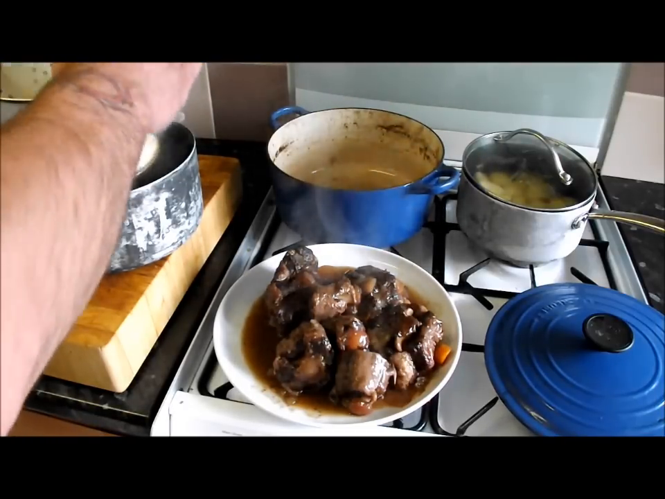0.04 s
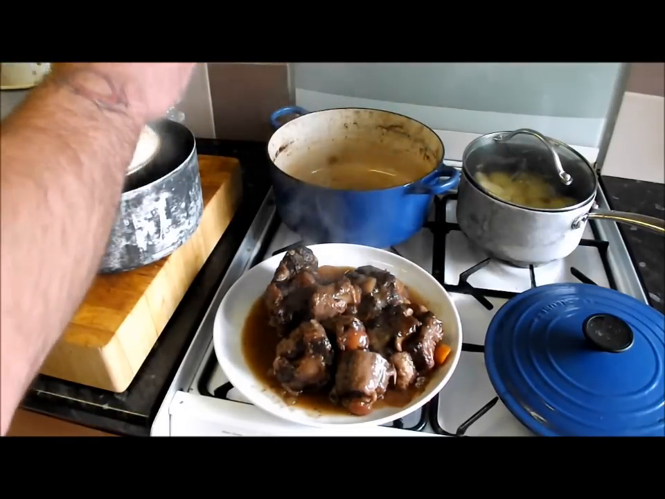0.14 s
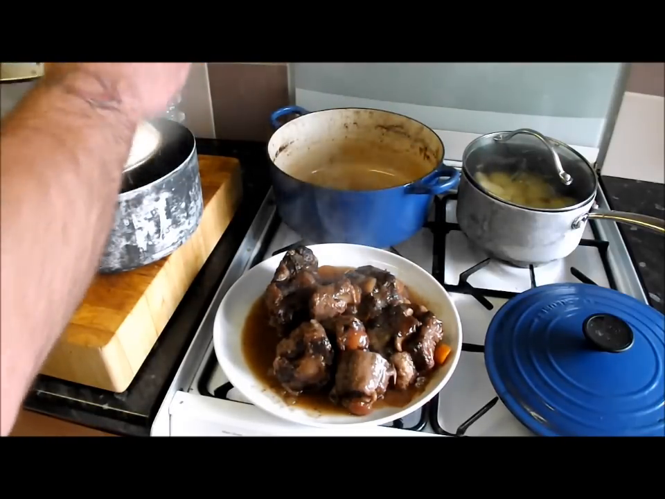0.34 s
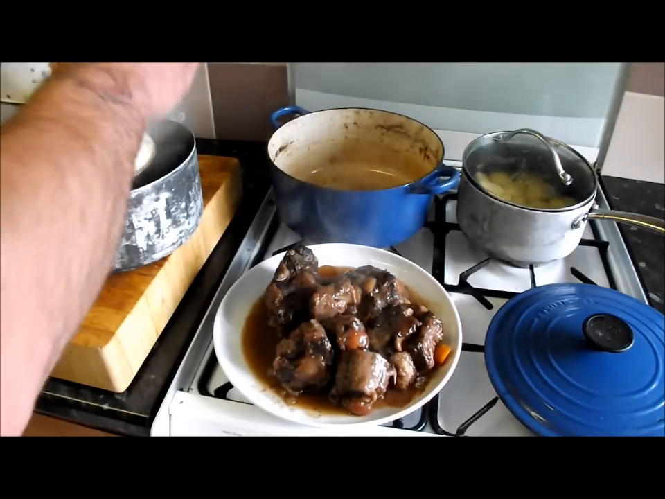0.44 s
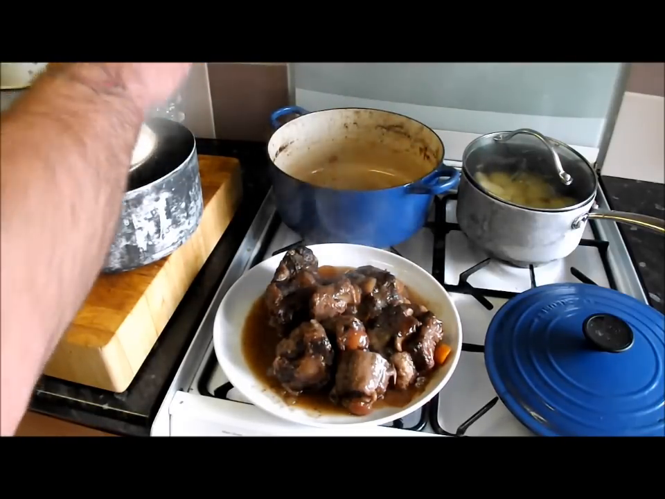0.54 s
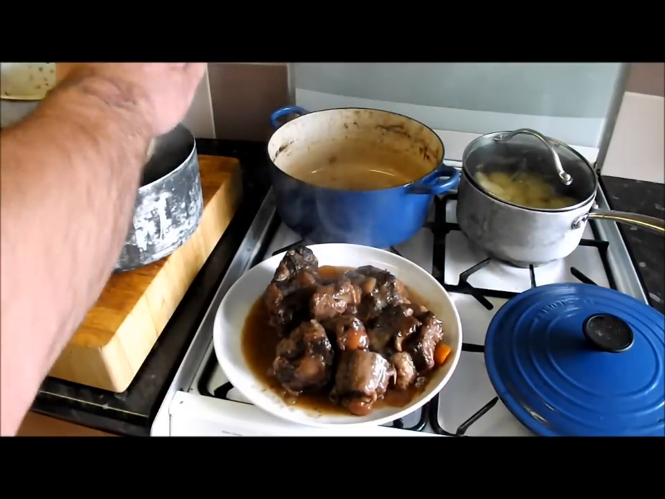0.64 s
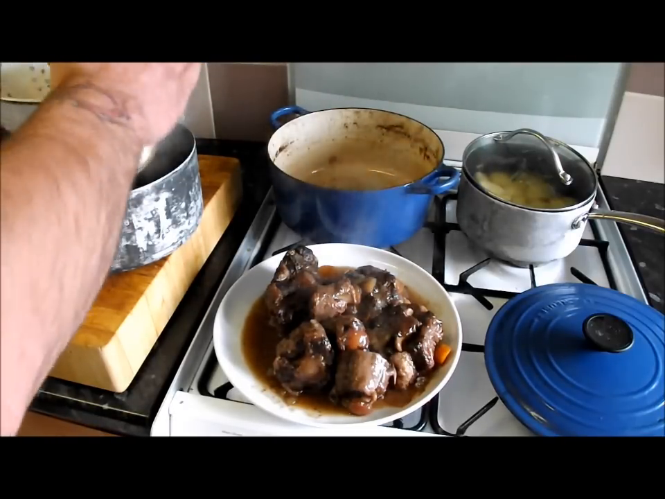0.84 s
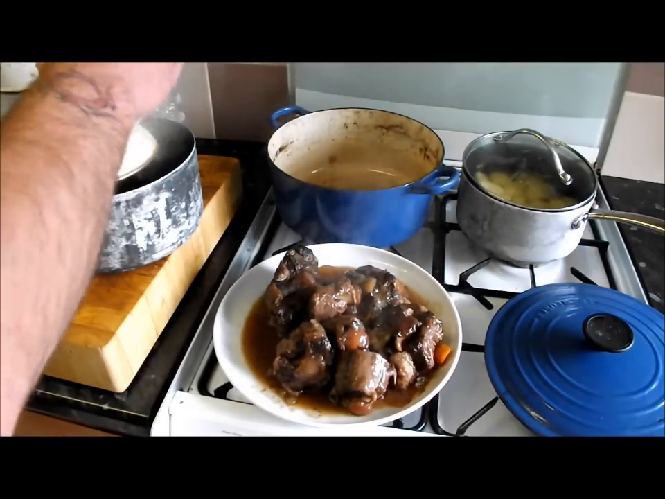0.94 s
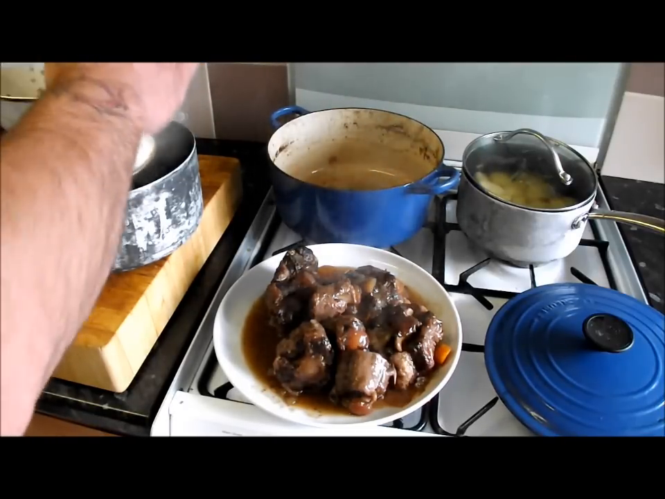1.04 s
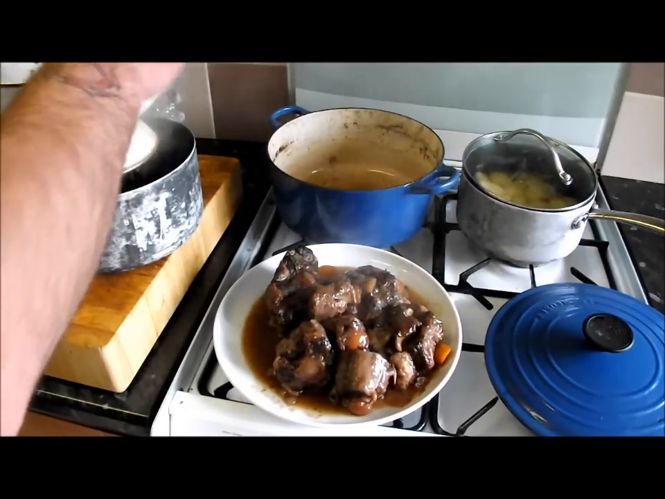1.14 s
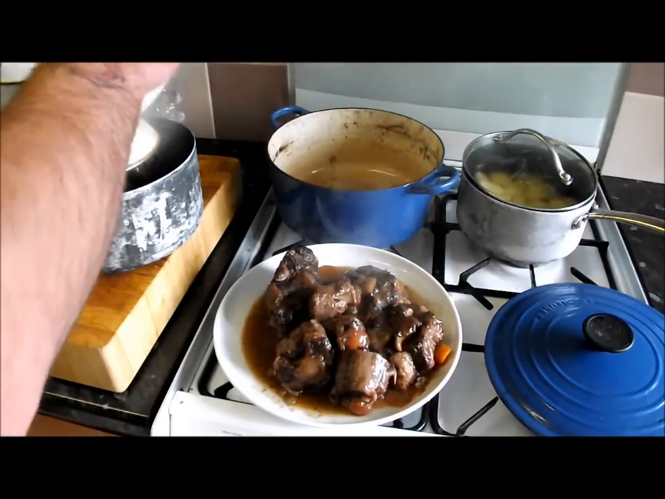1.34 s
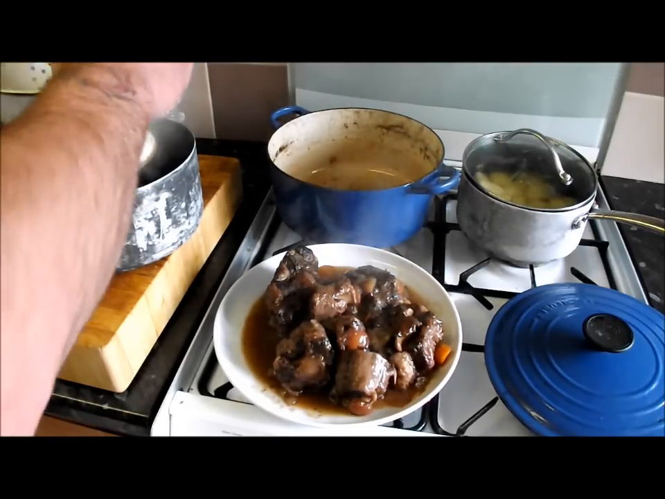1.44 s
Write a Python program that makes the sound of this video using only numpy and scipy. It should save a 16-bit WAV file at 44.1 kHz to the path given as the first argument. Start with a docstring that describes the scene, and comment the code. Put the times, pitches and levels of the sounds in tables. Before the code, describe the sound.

A metal colander taps a saucepan rim, close and sharp, in a small reverberant kitchen. Faint earlier ringing, light scraping and a tiny drip lead to a loud clank at 0.21 seconds with a small rebound. A softer tap comes at 0.42, the heaviest at 0.62, another at 0.81. After a faint graze, the last lands at 1.22; a drip and scrapes follow at 1.34 over quiet hum.

```python
"""Colander tapped on a saucepan

A metal colander is tapped five times on the rim of a saucepan in a small kitchen, close to a camera.
Each tap sums hand-damped modes, a dense noise clank and the pan's longer ring; noise decaying at a
separate rate in each frequency band gives the room. One rebound, a graze, light scrapes (resonant noise)
and two drips (rising sines) come between. Below lie coloured noise, two hum tones and, at the start,
a low rumble. A soft limit flattens the loudest peaks, as an overloaded microphone does."""
import sys
import numpy as np
from scipy import signal
from scipy.fft import rfft, irfft, next_fast_len
from scipy.io import wavfile
from scipy.ndimage import uniform_filter1d, map_coordinates

SR = 44100
rng = np.random.default_rng(int(sys.argv[2]) if len(sys.argv) > 2 else 0)


def waveform_to_disk(signal):
    """Save audio, clipped to [-1, 1], as 16-bit WAV at the path in sys.argv[1]."""
    frames = np.transpose(np.atleast_2d(signal))
    scaled = np.clip(frames, -1, 1) * 32767
    samples = np.round(scaled).astype(np.int16)
    wavfile.write(sys.argv[1], SR, samples)


N = 66150
T = np.arange(N) / SR  # time in seconds

# Taps; the spot struck decides how strongly each leading mode speaks. Each row: start in seconds,
# level in dB, then in relative dB thud, low mode, main mode, upper mode, ping mode and treble,
# damping time as a ratio, clank in relative dB, room in relative dB.
TAPS = [(0.2134, -4.5, 0.5, 9.5, 8, 6.5, -7, 3, 0.62, 1.5, -1.5),
        (0.4186, -16, -9.5, -3, 5.5, 1.5, -0.5, 0, 0.96, 3.5, 5.5),
        (.6228, -3, -1.5, 5, 2, -1.5, -5.5, 4.5, 1.49, -2, -3),
        (0.8122, -7.5, -7.5, -21, 7, -7, 2.5, 0, 1.31, 1, -1.5),
        (1.2158, -7.5, -8, -11, -3, 5, 1.5, 0.5, 0.52, 2, 3)]
# The pan's answer to each tap. Each row: low tone in relative dB, high tone in relative dB, pitch ratio.
PAN_ANSWER = [(5, 4, .981), (4, -8, 1), (-1, -10, 1), (-1, 4, 1), (-1, -6, 1)]
# Single blows, each one row: start in seconds, level in dB.
EARLIER_TAP = (-.2, -2.2)  # begins before the scene; the pan still rings faintly
REBOUND = (.2525, -22.5)  # the colander falls back on the rim after the first tap
GRAZE = (1.114, -35.5)  # the colander grazes the rim
GRAZE_CLANK_DB, GRAZE_ROOM_DB = 4, 8.5

# Quickly damped modes of the hand-held colander. Each row: frequency in Hz, relative level in dB,
# T60 in seconds at damping ratio 1.
COLANDER_MODES = [(751, -20.5, 0.039), (972, -12, 0.024), (1463, -11, 0.027), (1725, -23, 0.056),
                  (2267, -11, 0.024), (2701, -4, 0.045), (2978, -6, 0.037), (3183, -4.5, 0.046),
                  (3316, -11.5, 0.06), (4427, -7, 0.023), (5183, -21.5, 0.022), (6673, -18.5, 0.025),
                  (6650, -12.5, 0.024), (10230, -22, 0.025)]
# Centres of the leading modes, low, main, upper and ping: one frequency in Hz each.
LEADING_HZ = [1430, 2700, 3220, 4480]
LEADING_WIDTH = 0.05  # as a fraction of the centre frequency
THUD_HZ, BODY_HZ, UPPER_HZ, TREBLE_HZ = 400, 1000, 3500, 5500  # corners of the spectral tilt
RING_DB, RING_SCATTER_DB, ATTACK_S = -2, 1, 0.00018

# Dense rattle of the perforated bowl. Each row: frequency in Hz, relative level in dB per Hz.
CLANK_SPECTRUM = [(60, -42), (250, -8), (500, -21), (720, -2), (1000, -10.5), (1200, -8), (1600, 2.5),
                  (1900, -1), (2900, 4), (3450, -5), (3950, -9.5), (5200, -6), (5900, -9.5), (7200, -3),
                  (8500, -13.5), (10000, -13), (13000, -21.5), (16000, -36)]
CLANK_DB, CLANK_T60_S, SHIMMER_DB, SHIMMER_T60_S = -4, 0.038, -25.5, 0.32

# Longer ring of the saucepan, its main tones in close beating groups. Each row: frequency in Hz
# at pitch ratio 1, relative level in dB, T60 in seconds.
SAUCEPAN_MODES = [(835, -41, .9), (1532, -23, .42), (1560, -20, .42), (1598, -26, .3), (2700, -24, .4),
                  (2738, -19, .45), (2917, -28, .4), (3005, -28, .4), (4480, -29, .3), (4560, -28, .38),
                  (5380, -32, .35), (6900, -31, .35)]
# Centres of the pan's low tone, high tone and ping: one frequency in Hz each.
PAN_TONES_HZ = [1560, 2720, 4520]
PAN_WANDER_RAD, PAN_WANDER_PER_S, PAN_ATTACK_S = 0.4, 70, 0.009

# Light scrapes and touches of metal on metal. Each row: peak time in seconds, level in dB,
# rise in seconds, fall in seconds, centre in Hz, width in Hz.
SCRAPES = [(.065, -40.5, 0.017, 0.02, 3100, 414), (0.084, -35, 0.0037, 0.026, 3190, 248),
           (0.183, -42, 0.02, 0.037, 3040, 376), (.51, -39.5, 0.11, 0.054, 2930, 400),
           (0.586, -50, 0.076, 0.024, 1173, 198), (.595, -46.5, 0.075, 0.014, 4080, 298),
           (0.612, -30.5, 0.027, 0.039, 2980, 278), (1.189, -46, 0.15, 0.024, 3000, 700),
           (1.353, -36.5, .012, 0.017, 3030, 424), (1.46, -43, 0.055, 0.078, 3000, 615)]
# Drops from the colander. Each row: start in seconds, level in dB.
DRIPS = [(.045, -45), (1.342, -31)]
DRIP_HZ, DRIP_RISE_HZ_PER_S, DRIP_T60_S = 1240, 4100, 0.078

# Reverberation time of the kitchen. Each row: frequency in Hz, T60 in seconds.
KITCHEN_T60 = [(150, 0.094), (400, 1), (800, .45), (2500, 0.57), (7000, 0.45), (10000, 0.45), (15000, 0.35)]
# Colour of the reverberation. Each row: frequency in Hz, relative level in dB.
KITCHEN_COLOUR = [(100, -37), (400, -9), (600, -3), (1500, -2.5), (3000, -2.5), (7000, 0), (8500, -5),
                  (15000, -2.5)]
KITCHEN_DB, KITCHEN_BUILD_S = -4.5, 0.0074
# Diffuse sound that differs between the ports. Each row: frequency in Hz, gain in dB.
SIDE = [(200, -48), (1000, -51), (4000, -26), (8000, -21), (14000, -13)]
LAG_S = 2.4e-5  # left port behind right

# Spectrum of the room noise. Each row: frequency in Hz, relative level in dB per Hz.
FLOOR = [(20, 2), (33, 2), (45, -7), (65, -10), (105, -20.5), (160, -22), (400, -25.5), (1000, -33),
         (1600, -22.5), (2200, -44.5), (3100, -21.5), (4200, -29), (7000, -64), (10000, -40.5),
         (15000, -71)]
FLOOR_DB = -46
# Mains hum. Each row: frequency in Hz, rms level in dB.
HUM = [(49.3, -47), (101, -66)]
RUMBLE_HZ, RUMBLE_DB, RUMBLE_HALVED_S = 25.3, -34.5, 0.12
CLIP_TOP, CLIP_HARDNESS, TOP_HZ = 0.54, 7, 16000  # full scale 1; hardness of the knee; band limit


def taps():
    """Superposition: the blows on the rim, an earlier one dying away, a rebound and a graze add up."""
    total = np.zeros((2, N))
    for (start_s, db, *spot), answer in zip(TAPS, PAN_ANSWER):
        total += amp(db) * placed(tap(*spot, *answer), start_s)
    earlier = tap(pan_low_db=5, pan_high_db=-1.5)
    rebound = tap(main_db=8.5, room_db=8.5)
    graze = tap(low_db=2, main_db=-22, upper_db=2, treble_db=-11, pan_high_db=-14,
                clank_db=GRAZE_CLANK_DB, room_db=GRAZE_ROOM_DB)
    for blow, (start_s, db) in [(earlier, EARLIER_TAP), (rebound, REBOUND), (graze, GRAZE)]:
        total += amp(db) * placed(blow, start_s)
    return total


def tap(thud_db=0, low_db=0, main_db=0, upper_db=0, ping_db=0, treble_db=0, length=1,
        clank_db=0, room_db=0, pan_low_db=0, pan_high_db=0, pitch=1):
    """Modal excitation: the spot struck weights the colander's ring and clank, and the pan's tones."""
    tilt = [(THUD_HZ, thud_db), (BODY_HZ, 0), (UPPER_HZ, 0), (TREBLE_HZ, treble_db)]
    leading_db = [low_db, main_db, upper_db, ping_db]

    def spot(f):
        return along(tilt, f) + favour(f, LEADING_HZ, leading_db)

    ring = amp(RING_DB) * ringing(COLANDER_MODES, spot, length=length)
    blow = ring + amp(clank_db) * clank(spot)
    blow = blow * (1 - np.exp(-T / ATTACK_S))
    room = amp(room_db) * kitchen(blow)
    return blow + room + saucepan(pan_low_db, pan_high_db, ping_db, pitch)


def clank(spot):
    """High modal density: modes too close to separate act as noise with a fast and a slow decay."""
    rattle = noise(lambda f: amp(along(CLANK_SPECTRUM, f)))
    rattle = filtered(rattle, lambda f: amp(spot(f)))
    fast = amp(CLANK_DB - 60 * T / CLANK_T60_S)
    shimmer = amp(SHIMMER_DB - 60 * T / SHIMMER_T60_S)
    return rattle * (fast + shimmer)


def saucepan(low_db, high_db, ping_db, pitch):
    """Beating: close, lightly damped modes sing on as two main tones, a high ping and faint others."""
    def spot(f):
        return favour(f, PAN_TONES_HZ, [low_db, high_db, ping_db])

    ring = ringing(SAUCEPAN_MODES, spot, pitch=pitch, wander=PAN_WANDER_RAD)
    return ring * (1 - np.exp(-T / PAN_ATTACK_S))


def ringing(modes, weight_db, pitch=1, length=1, wander=0):
    """Modal synthesis: a sum of exponentially damped sines; wander (rad) unsteadies their phase."""
    total = np.zeros(N)
    for hz, db, t60 in modes:
        start_db = db + weight_db(hz) + RING_SCATTER_DB * rng.normal()
        phase = 2 * np.pi * (hz * pitch * T + rng.random())
        if wander:
            phase = phase + wander * wobble(PAN_WANDER_PER_S)
        total += amp(start_db - 60 * T / (t60 * length)) * np.sin(phase)
    return total


def favour(f, centres_hz, levels_db):
    """Mode coupling: the dB by which a spot favours the modes near some frequencies."""
    return sum(db * np.exp(-((f / hz - 1) / LEADING_WIDTH) ** 2)
               for hz, db in zip(centres_hz, levels_db))


def scrapes(rough_db=-0.5, room_db=-2):
    """Friction-driven resonance: uneven grip makes one resonance sing, swelling and fading."""
    total = np.zeros(N)
    for peak_s, db, rise_s, fall_s, hz, width_hz in SCRAPES:
        unevenness = unit(uniform_filter1d(rng.standard_normal(N), size=200))  # size in samples
        grip = amp(rough_db * unevenness)
        swell = np.exp(np.minimum((T - peak_s) / rise_s, (peak_s - T) / fall_s))
        total += amp(db) * swell * unit(grip * band(hz, width_hz))
    return total + amp(room_db) * kitchen(total)


def drips(attack_s=0.0072):
    """Damped oscillation: each drop is a short sine whose frequency rises linearly."""
    tone = np.sin(2 * np.pi * (DRIP_HZ + DRIP_RISE_HZ_PER_S * T / 2) * T)
    ping = tone * amp(-60 * T / DRIP_T60_S) * (1 - np.exp(-T / attack_s))
    return sum(amp(db) * placed(ping + kitchen(ping), start_s) for start_s, db in DRIPS)


def kitchen(x):
    """Reverberation: convolution with noise in which each frequency dies at its own speed."""
    hz, t, z = signal.stft(rng.standard_normal((2, N)), SR, nperseg=256)
    decay = amp(-60 * t / along(KITCHEN_T60, hz)[:, None])
    tail = signal.istft(z * decay, SR, nperseg=256)[1][:, :N]
    tail = tail / np.linalg.norm(tail[0])
    tail = filtered(tail, lambda f: amp(along(KITCHEN_COLOUR, f)))
    tail = tail * (1 - np.exp(-T / KITCHEN_BUILD_S))
    return amp(KITCHEN_DB) * signal.fftconvolve(x[None], ports(*tail), axes=1)[:, :N]


def background():
    """Stationary noise and tones: diffuse room noise, steady mains hum and a rumble that dies away."""
    air = ports(*[noise(lambda f: amp(along(FLOOR, f))) for _ in range(2)])
    hum = sum(amp(db) * np.sqrt(2) * np.sin(2 * np.pi * (hz * T + rng.random())) for hz, db in HUM)
    rumble = np.sin(2 * np.pi * (RUMBLE_HZ * T + rng.random()))
    rumble = rumble / (1 + (T / RUMBLE_HALVED_S) ** 4)
    return amp(FLOOR_DB) * air + hum + amp(RUMBLE_DB) * rumble


def ports(mid, side):
    """Partial coherence: a diffuse sound shares its mid and opposes its side at the two ports."""
    side = filtered(side, lambda f: amp(along(SIDE, f)))
    return np.array([mid + side, mid - side])


def noise(response):
    """Spectral shaping: white noise through a response, scaled to rms 1."""
    return unit(filtered(rng.standard_normal(N), response))


def band(centre_hz, width_hz):
    """Resonance: noise under one bell-shaped curve."""
    return noise(lambda f: 1 / (1 + ((f - centre_hz) / (width_hz / 2)) ** 2) ** 0.54)


def wobble(rate):
    """Slow random modulation: a smooth curve through random knots, rate of them a second."""
    return map_coordinates(rng.standard_normal(1000), [T * rate], mode="mirror")


def filtered(x, response):
    """Linear filtering: the spectrum of x times a response of frequency."""
    m = next_fast_len(N + SR // 2)  # padded against wrap-around
    return irfft(rfft(x, m) * response(np.fft.rfftfreq(m, 1 / SR)), m)[..., :N]


def placed(x, start_s):
    """Time shift: x moved to start at start_s, which may be negative."""
    return np.pad(x, ((0, 0), (N, N)))[:, N - round(start_s * SR):][:, :N]


def along(points, hz):
    """Logarithmic frequency scale: interpolation of (Hz, value) points."""
    f, v = np.transpose(points)
    return np.interp(np.log(hz + 1), np.log(f + 1), v)


def amp(db):
    """Level: decibels to amplitude gain."""
    return 10 ** (np.asarray(db) / 20)


def unit(x):
    """Effective value: x scaled to rms 1."""
    return x / np.sqrt(np.mean(x ** 2) + 1e-20)


def scene():
    """Interaural-type delay: the whole sum reaches the right port a little sooner than the left."""
    total = taps() + scrapes() + drips() + background()
    sides = np.array([[-1], [1]])  # left late, right early, by half the lag each
    return filtered(total, lambda f: np.exp(1j * np.pi * f * LAG_S * sides))


def record(dry):
    """Saturation: the microphone flattens the loudest peaks and passes nothing above its band limit."""
    clipped = dry / (1 + np.abs(dry / CLIP_TOP) ** CLIP_HARDNESS) ** (1 / CLIP_HARDNESS)
    return filtered(clipped, lambda f: f < TOP_HZ)


dry = scene()
out = record(dry)
waveform_to_disk(out)
```